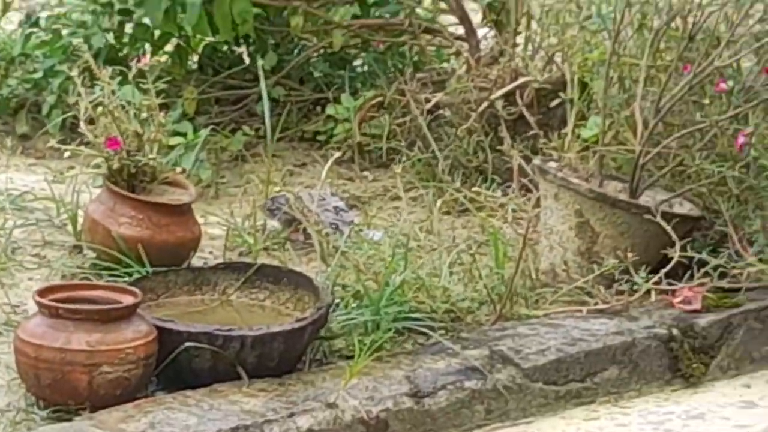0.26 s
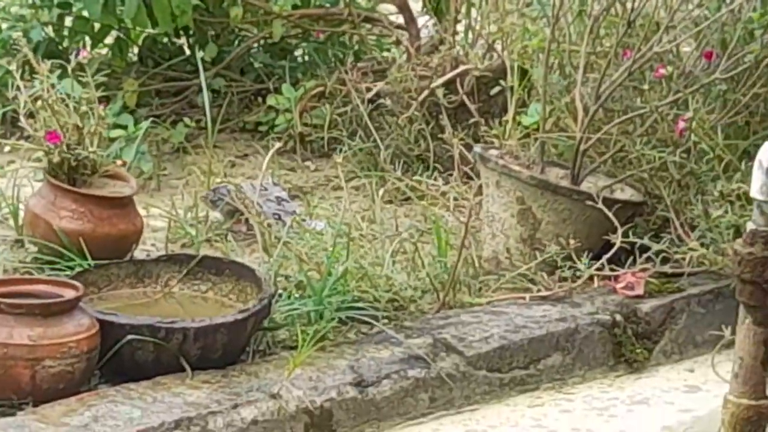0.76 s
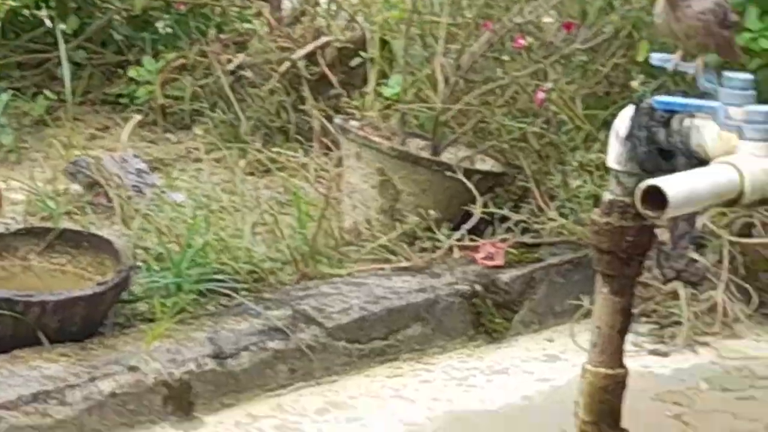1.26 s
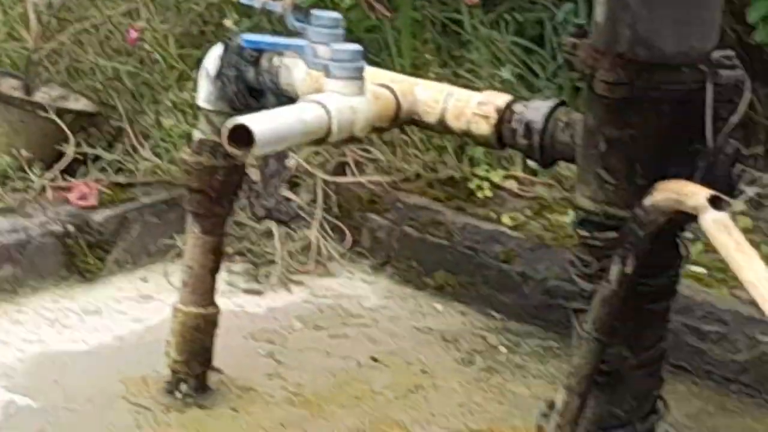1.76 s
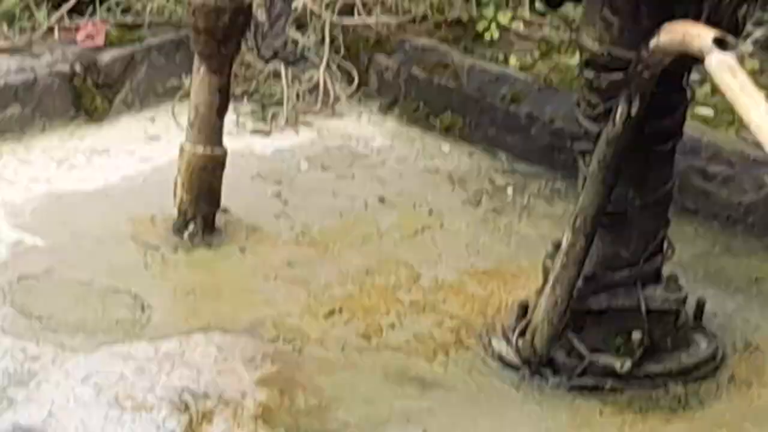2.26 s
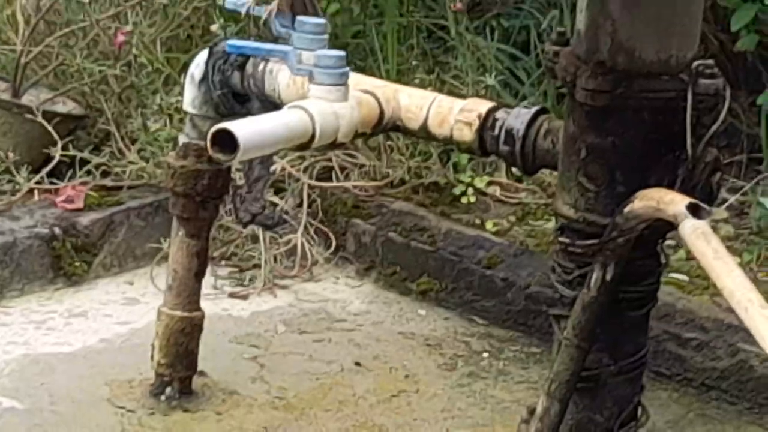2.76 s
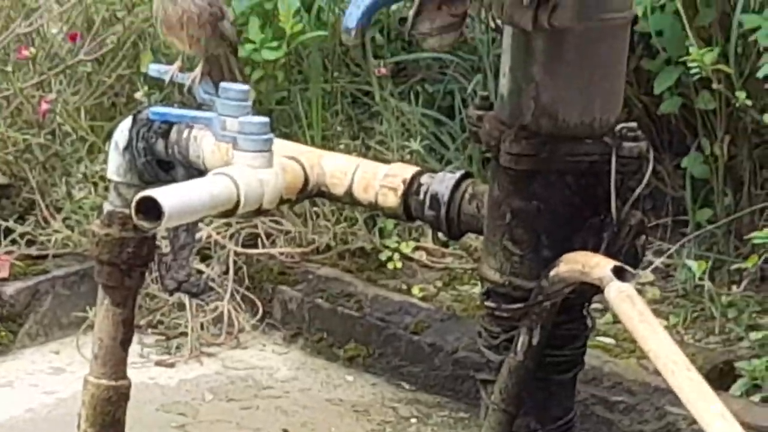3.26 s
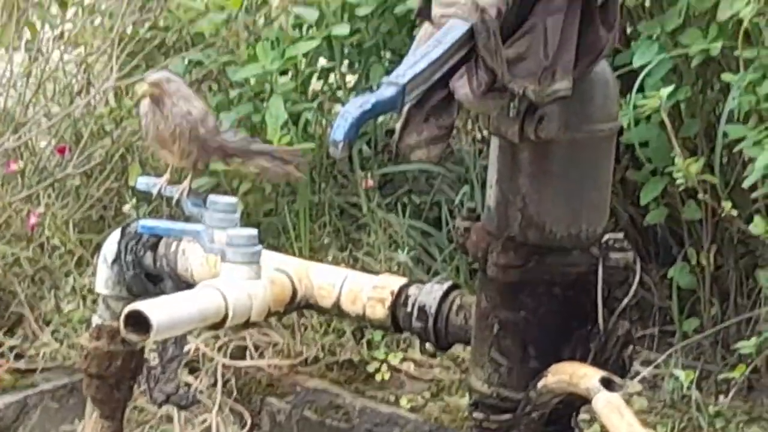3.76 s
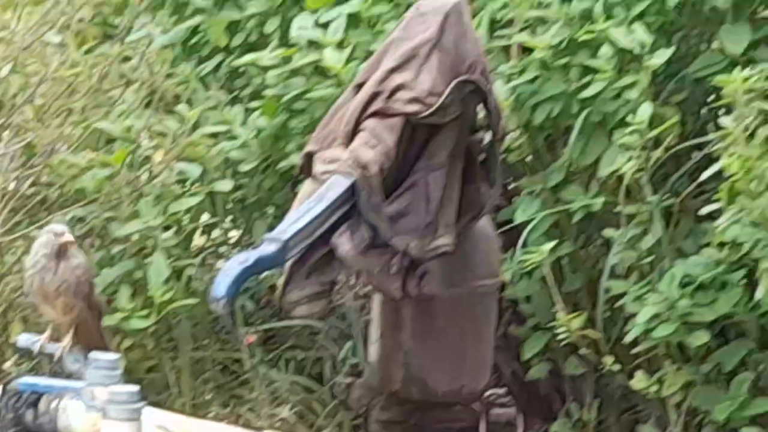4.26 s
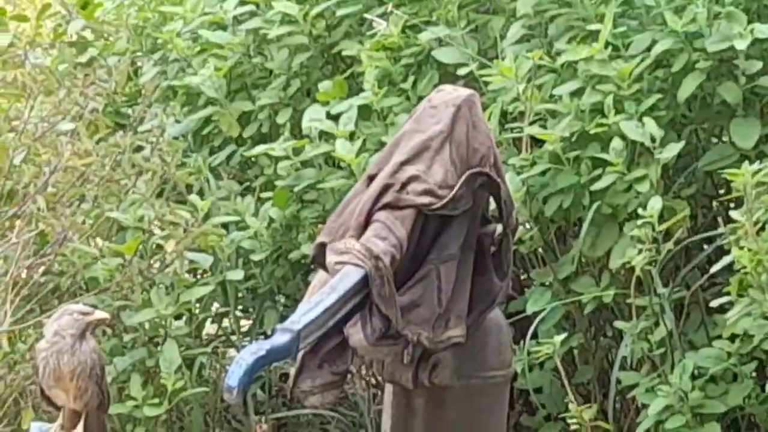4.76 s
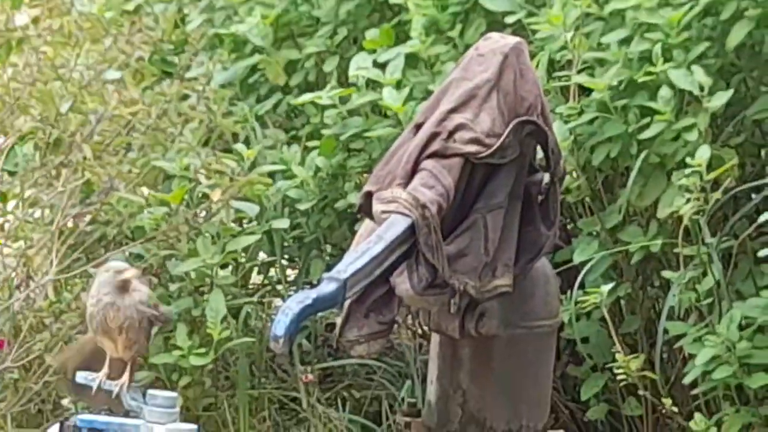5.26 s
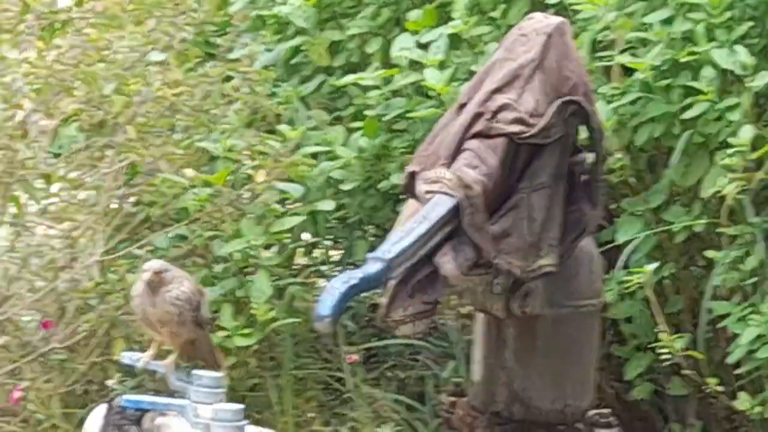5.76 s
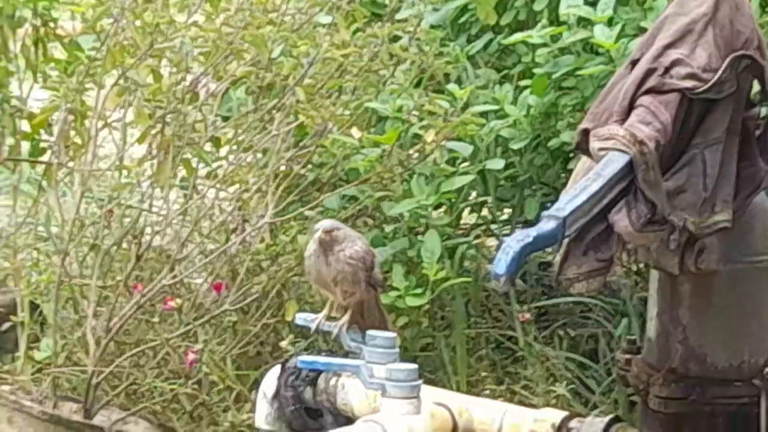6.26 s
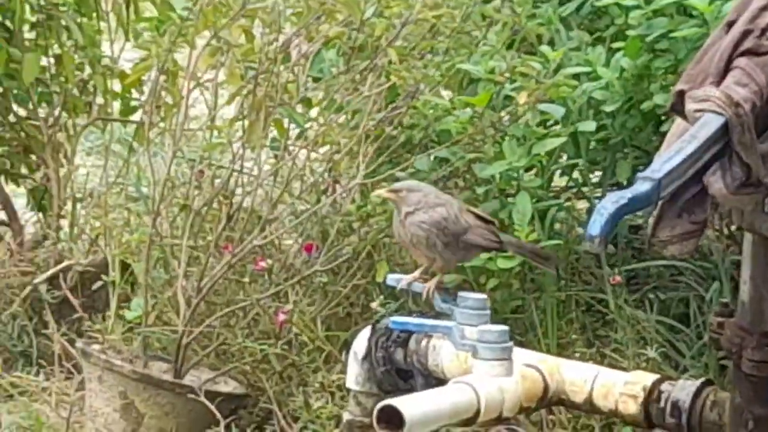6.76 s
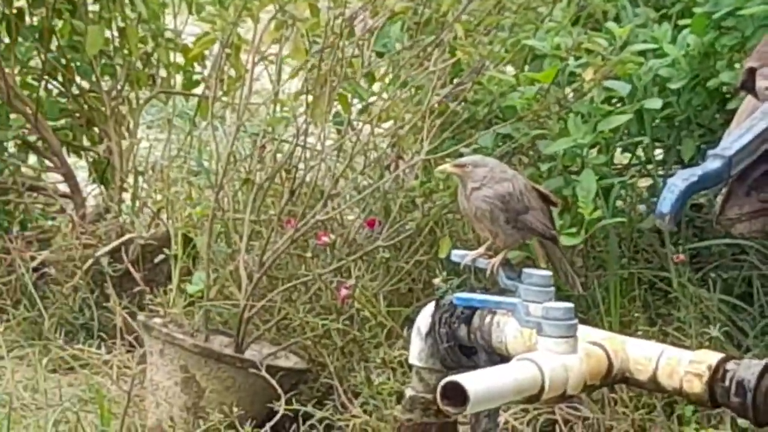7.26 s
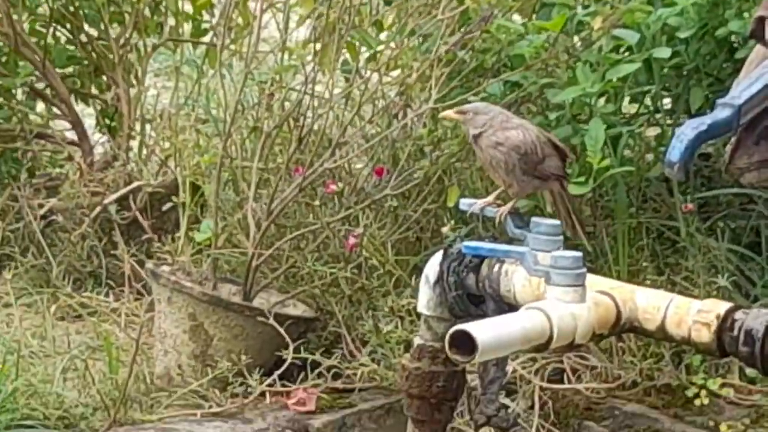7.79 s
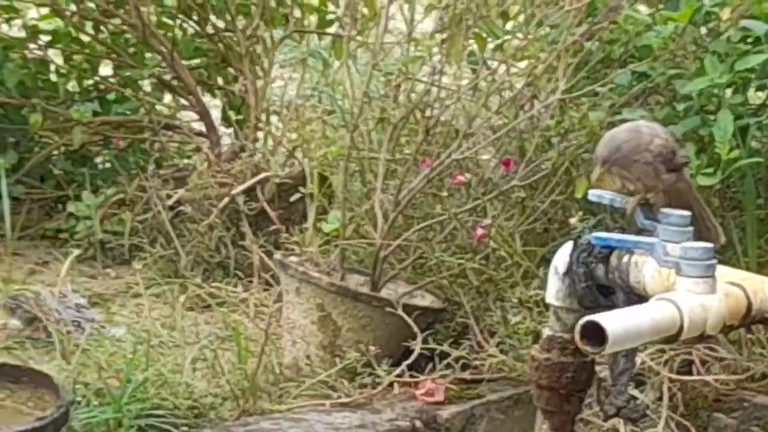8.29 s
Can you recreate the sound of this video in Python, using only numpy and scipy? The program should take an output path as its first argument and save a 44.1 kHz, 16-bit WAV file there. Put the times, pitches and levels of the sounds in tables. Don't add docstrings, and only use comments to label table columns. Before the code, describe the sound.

A garden heard through a hand-held stereo phone. A distant single-cylinder engine throbs as a low, slightly wavering hum throughout, fading a little at the end. From 0 to 0.8 s babblers chatter quickly: short arched whistles around 2 to 3 kHz mixed with dry, harsh chucks. At 1.75 s a nearer bird on the left slides down and breaks hoarse; two quick finger taps crack at 1.9 s, with more chirps around 2 s. A soft ringing tap follows at 2.4 s, then faint pips until 3.1 s. At 3.75 s a longer, louder slide turns into a growl and a hoarse chuck, with a heavy low thump at 3.8 s. Faint peeps follow at 4.1 s. Sparse whistles and chucks return from 5.3 to 8.3 s, with a very faint tap at 7.5 s. Thin cicada buzz swells intermittently, strongest after 5.9 s, as a light breeze rustles leaves.

```python
import sys
import numpy as np
from scipy import signal
from scipy.fft import rfft, irfft
from scipy.io import wavfile
from scipy.ndimage import uniform_filter1d

SR = 44100
rng = np.random.default_rng(int(sys.argv[2]) if len(sys.argv) > 2 else 0)


def transcribe(u):
    v = np.clip(np.atleast_2d(u).T, -1, 1)
    q = np.round(v * 32767).astype(np.int16)
    wavfile.write(sys.argv[1], SR, q)


def level_to_linear(level):
    exponent = np.asarray(level, float) / 20
    return 10 ** exponent


N = 376173
T = np.arange(N) / SR
HZ = np.fft.rfftfreq(N, 1 / SR)
LEFT_LAG_S = .0004

# (frequency [Hz], width [Hz], level [dB])
THROAT = [(870, 300, -3), (2200, 400, 0), (3100, 420, -8), (4250, 440, -2), (5200, 520, -3),
          (6150, 420, -11), (7600, 1600, -23), (12400, 1200, -27), (14600, 1500, -23)]


def at(table, hz):
    f, v = np.transpose(table)
    return np.interp(np.log(np.maximum(hz, 1)), np.log(f), v)


def unit(x):
    return x / np.sqrt(np.mean(x ** 2))


def ramp(t, start_s, length_s):
    return np.clip((t - start_s) / length_s, 0, 1)


def walk(rate, size=N):
    k = max(int(SR / rate), 1)
    steps = np.repeat(rng.standard_normal(size // k + 1), k)
    return 1.63 * uniform_filter1d(uniform_filter1d(steps, k), k)[:size]


def resonances(modes, hz):
    return np.sqrt(sum(level_to_linear(2 * db) / (1 + ((hz - f) / (width / 2)) ** 2) ** 2 for f, width, db in modes))


def wide_noise(gain, alike, pan_db):
    shared, own = rfft(rng.standard_normal((2, N)))
    alike = np.clip(alike, 0, .99)
    late = shared * np.exp(-2j * np.pi * HZ * LEFT_LAG_S)
    left = level_to_linear(pan_db) * (alike * late + np.sqrt(1 - alike ** 2) * own)
    share = 2 / np.sqrt(1 + level_to_linear(pan_db) ** 2 + 2 * alike * level_to_linear(pan_db))
    out = irfft(gain * share * np.array([left, shared]), N)
    return out / np.sqrt(np.mean(out.mean(axis=0) ** 2))


def add(out, start_s, x, pan_db):
    i = int(start_s * SR)
    n = np.arange(len(x))
    fade = np.clip(np.minimum(n, n[::-1]) / (.0025 * SR), 0, 1)
    out[:, i:i + len(x)] += x * fade * 2 / (1 + level_to_linear(np.array([[-pan_db], [pan_db]])))


def pump():
    # (time [s], firing rate [Hz], level [dB])
    run = [
        (0, 11.45, -40),
        (1, 11.7, -41),
        (2.4, 11.2, -39.5),
        (3.5, 12.4, -41),
        (4.598, 11.1, -40.5),
        (5.8, 11.06, -40.5),
        (7, 11.6, -39),
        (7.9, 12.7, -42.5),
        (8.53, 12, -50),
    ]
    # (multiple of firing rate [1], level [dB])
    orders = [(3, -22), (4, -31), (5, -2), (6, -7), (7, -2.5), (8, -2), (9, 0), (10, -5), (11, 2.5),
              (12, -5), (13, -14), (14, -6.5), (16, -10), (18, -13)]
    s, hz, db = np.transpose(run)
    turn = 2 * np.pi * np.cumsum(np.interp(T, s, hz)) / SR
    hum = np.zeros(N)
    for k, level_db in orders:
        sway = level_to_linear(level_db + 1.9 * walk(2.5))
        hum += sway * np.sin(np.round(k) * turn + 7 * rng.random() + .5 * walk(3))
    hum = unit(hum) * level_to_linear(np.interp(T, s, db))
    return np.array([level_to_linear(-1.5) * np.roll(hum, int(LEFT_LAG_S * SR)), hum])


def garden():
    # (frequency [Hz], level [dB per Hz])
    air_colour = [(15, -57), (25, -39), (43, -6.5), (119, 0.5), (156, -15.5), (342, -12), (424, -17.5),
                  (1120, -29), (1280, -31), (2880, -35.5), (6120, -47), (7800, -47.5), (8690, -70),
                  (10500, -61.5), (15700, -69)]
    # (frequency [Hz], likeness [0-1])
    air_alike = [(60, 1), (250, 0.92), (500, 1), (1000, 0.15), (2000, 0.04), (5000, 0.011)]
    # (frequency [Hz], left minus right [dB])
    air_pan = [(60, 1.5), (110, -2.5), (200, -0.5), (380, -3.5), (700, -1.5), (1290, -5.5), (2380, -4.5),
               (4400, 1), (8120, -10.5), (15000, -1)]
    # (frequency [Hz], level [dB per Hz])
    leaf_colour = [(300, 1), (700, -4), (1500, -0.5), (3000, 1), (5000, -2), (7500, -11), (9000, -13),
                   (10500, -7), (12000, -5.5), (14500, -7), (15800, -15)]
    # (frequency [Hz], left minus right [dB])
    leaf_pan = [(60, 18), (110, 19), (200, 4), (380, -2), (700, 10), (1290, -7), (2380, -8.5), (4400, -3.5),
                (8120, -12.5), (15000, -72)]
    # (time [s], level [dB])
    breeze = [
        (0, -68),
        (1.2, -72),
        (5.0, -70),
        (5.7, -64),
        (6.9, -60.5),
        (7.7, -60.5),
        (8.53, -65),
    ]
    # (start [s], end [s], level
    # [dB])
    choruses = [
        (-.5, 1.71, -73.5),
        (2.65, 4.94, -72.5),
        (5.9, 8.3, -68.5),
    ]
    # (frequency [Hz], width [Hz], level [dB])
    shells = [(7870, 340, 7.5), (7340, 650, -0.5), (10280, 430, -2)]
    fade_db_per_s, rest_db = 28, -88

    alike = at(air_alike, HZ)
    air = wide_noise(level_to_linear(at(air_colour, HZ)), alike, at(air_pan, HZ)) * level_to_linear(-43 + 0.18 * walk(6))
    gust_db = np.interp(T, *np.transpose(breeze)) + 6.15 + .5 * walk(14)
    leaves = wide_noise(level_to_linear(at(leaf_colour, HZ)), 0.85 * alike, at(leaf_pan, HZ)) * level_to_linear(gust_db)
    chorus_db = np.full(N, float(rest_db))
    for start, end, db in choruses:
        outside_s = np.maximum(np.maximum(start - T, T - end), 0)
        chorus_db = np.maximum(chorus_db, db - fade_db_per_s * outside_s)
    cicadas = wide_noise(resonances(shells, HZ), .3, -41.0) * level_to_linear(chorus_db + 1.0 * walk(50))
    return air + leaves + cicadas


def note(shape, length, top_hz, db, octave_db):
    scoop, rise_s, sag, plunge, fall_s, fade_db = shape
    t = T[:int(length * SR)]
    early, late = 1 - ramp(t, 0, rise_s), ramp(t, length - fall_s, fall_s)
    hz = top_hz * (1 - scoop * early ** 2 - sag * np.maximum(t - rise_s, 0) - plunge * late ** 2)
    db = db - 8 * early ** 2 - fade_db * t - 7 * late ** 2
    return hz, db, db + octave_db - 12 * (1 - ramp(t, 0, .022))


def whistles(out):
    # (time [s], length [s], top [Hz], level [dB], octave against the note [dB])
    peeps = [
        (.006, 0.03, 2385, -44, -8),
        (.058, 0.08, 2370, -47, -1),
        (.135, 0.071, 2990, -54.5, 2),
        (.506, 0.051, 2514, -50.5, -0.5),
        (.58, .016, 2330, -55, -20),
        (1.946, 0.04, 2380, -48, -2),
        (4.082, 0.048, 2465, -52.5, -0.5),
        (4.178, .052, 2460, -50, -13),
        (5.49, .04, 2880, -61, -30),
    ]
    high_peeps = [
        (.003, 0.023, 3260, -56, -7),
        (.052, 0.051, 3240, -49.5, -4.5),
        (8.153, 0.037, 3140, -53.5, -32),
        (8.262, .042, 2022, -55.5, -7),
    ]
    falls = [
        (.028, 0.042, 2186, -43, -20),
        (.335, 0.049, 2200, -50, -7),
        (6.12, 0.073, 2335, -55.5, -25),
    ]
    arches = [
        (.23, .048, 2550, -44.5, -11),
        (.688, .075, 2670, -45, -8),
    ]
    hooks = [
        (.588, .046, 3030, -49.5, -12),
        (1.996, .042, 3000, -48, -30),
        (6.172, .048, 3160, -50, -6),
    ]
    drones = [(1.61, .022, 2070, -60, -20), (1.65, .105, 3600, -64, -25), (1.842, .05, 2700, -59.5, -22),
              (2.8, .14, 3610, -64, -25), (5.33, .03, 2120, -62, -25), (5.6, .08, 540, -56, -9),
              (5.675, .065, 2750, -56, -28), (5.72, .08, 3320, -69, -20), (6.222, .045, 3130, -60, -5),
              (6.63, .035, 2070, -56, -26), (8.05, .15, 4340, -65.5, -25)]
    # (time [s], pitch [Hz], level [dB])
    pip_calls = [
        (2.5, 2980, -66),
        (2.565, 2960, -59.5),
        (2.63, 2960, -62),
        (2.69, 2940, -59.5),
        (2.76, 2892, -62),
        (2.95, 2880, -63),
        (3.07, 2880, -67),
    ]
    # (scoop up [share], rise [s], sag [share per s], plunge [share], fall [s], fade [dB per s])
    peep_shape = (.1, .019, .75, .035, .014, 50)
    fall_shape = (.04, .008, 1.7, .06, .016, 40)
    arch_shape = (.2, .021, 1.1, .27, .018, 20)
    hook_shape = (.07, .024, .1, .5, .018, 1)
    drone_shape = (.012, .012, .15, .01, .02, 15)
    pip_shape = (.005, .012, .3, .02, .014, 1)
    far_pan_db, high_pan_db, breath_db = -7, -2, -11.5

    pips = [(s, .026, hz, db, -np.inf) for s, hz, db in pip_calls]
    groups = ((peeps, peep_shape, far_pan_db), (high_peeps, peep_shape, high_pan_db),
              (falls, fall_shape, far_pan_db), (arches, arch_shape, far_pan_db),
              (hooks, hook_shape, far_pan_db), (drones, drone_shape, far_pan_db), (pips, pip_shape, far_pan_db))
    for notes, shape, pan_db in groups:
        for s, *call in notes:
            hz, db, octave_db = note(shape, *call)
            size = len(hz)
            turn = 2 * np.pi * np.cumsum(hz * (1 + .007 * walk(250, size=size))) / SR
            tone = level_to_linear(db + 1.8 * walk(150, size=size)) * np.sin(turn)
            octave_db = octave_db + 3 * walk(150, size=size) - 80 * (1 - hz / hz.max())
            octave = level_to_linear(octave_db) * np.sin(2 * turn + 1)
            husk = 1 + level_to_linear(breath_db) * walk(1500, size=size)
            add(out, s, np.sqrt(2) * husk * (tone + octave), pan_db)


def rasp(size, weight):
    hz = np.fft.rfftfreq(size, 1 / SR)
    flaps = rng.standard_normal(size) * level_to_linear(2.4 * walk(300, size=size))
    return unit(irfft(rfft(flaps) * resonances(THROAT, hz) * weight(np.maximum(hz, 1)), size))


def chucks(out):
    # (time [s], length [s], loudest [Hz], level [dB], spread [octaves])
    ahead = [(.005, 0.076, 3600, -51, 1.1), (0.088, 0.04, 3440, -49, 0.6), (0.124, 0.097, 3300, -54.5, 1.2),
             (0.609, 0.041, 2700, -50, 0.87), (1.978, 0.017, 2200, -58, 0.45),
             (2.024, 0.023, 2780, -47, 0.89), (5.538, 0.085, 2500, -56, .6),
             (6.202, 0.039, 2400, -50, 1.25), (6.701, 0.043, 3500, -56, 0.38),
             (7.146, 0.017, 2980, -54.5, .4), (7.23, 0.036, 3400, -55, 0.24),
             (7.581, 0.042, 2300, -49.5, 1.9), (8.039, .03, 2000, -58, .4)]
    right = [
        (.355, 0.038, 3000, -54, 1.9),
        (.752, 0.035, 2600, -50, 1.4),
        (3.455, 0.036, 2000, -54.5, 1.5),
        (4.085, .17, 3400, -60, 0.73),
        (4.23, 0.035, 2320, -56, 0.99),
        (5.6, 0.09, 2285, -51, 0.76),
        (5.68, 0.09, 2600, -59, 0.6),
        (6.66, 0.041, 2580, -51, 0.77),
        (7.21, 0.023, 1300, -54, .9),
    ]
    for calls, pan_db in ((ahead, -1.2), (right, -8)):
        for s, length, top_hz, db, spread in calls:
            def colour(hz):
                bump = np.exp(-(np.log2(hz / top_hz) / spread) ** 2)
                return bump / resonances(THROAT, hz) ** .7
            swell = np.hanning(int(length * SR)) ** .55
            add(out, s, level_to_linear(db) * swell * rasp(len(swell), colour), pan_db)


def voice(hz, db, rough, fall_db):
    rough, size = np.clip(rough, 0, .97), len(hz)
    turn = 2 * np.pi * np.cumsum(hz * (1 + 0.058 * rough * walk(600, size=size))) / SR
    gains = []
    for k in range(1, 9):
        chest = .25 * (k == 1) * (1 - rough) ** 3
        throat = resonances(THROAT, k * hz) ** 1.2 + .02 + chest
        gains.append(throat * level_to_linear(-fall_db * np.log2(k)) * (k * hz < 7000))
    gains = np.array(gains)
    gains /= np.sqrt(np.sum(gains ** 2, axis=0) / 2)
    clear = sum(g * np.sin((k + 1) * turn + k * k) for k, g in enumerate(gains))
    return level_to_linear(db) * (np.sqrt(1 - rough) * clear + np.sqrt(rough) * rasp(size, np.ones_like))


def slide(s, knee_s, knee_db, rasp_db, speed):
    # (time after the knee [s], pitch [Hz], level against the rasp [dB])
    voice_break = [
        (.008, 1826, -4),
        (.018, 1680, -0.5),
        (.028, 1130, 2.5),
        (.037, 930, -4.5),
        (0.049, 820, 0),
    ]
    onset_hz, whistle_hz, knee_hz, bow_hz = 2340, 2260, 2050, 43.8
    onset_s, onset_db, whistle_db = .006, -14, -38
    clear_hz, hoarse_hz = 1810, 910
    whistle_fall_db, rasp_fall_db = 3.5, -1.5

    after, low_hz, low_db = np.transpose(voice_break)
    times = np.r_[s, s + onset_s, knee_s, knee_s + after / speed]
    t = np.arange(s, times[-1], 1 / SR)
    smooth = lambda v: uniform_filter1d(np.interp(t, times, v), size=90, mode="nearest")
    held = ramp(t, s + onset_s, knee_s - s - onset_s)
    hz = smooth(np.r_[onset_hz, whistle_hz, knee_hz, low_hz]) + bow_hz * np.sin(np.pi * held)
    level_db = smooth(np.r_[whistle_db + onset_db, whistle_db, knee_db, rasp_db + low_db])
    level_db += (whistle_db - knee_db) * (held - held ** 2.8) + 0.5 * walk(155, size=len(t))
    rough = ramp(-hz, -clear_hz, clear_hz - hoarse_hz) ** 1.9
    fall_db = whistle_fall_db + (rasp_fall_db - whistle_fall_db) * ramp(t, knee_s, .018)
    return voice(hz, level_db, rough, fall_db)


def scold(length, first_hz, last_hz, db, fall_db):
    size = int(length * SR)
    return np.hanning(size) ** .28 * voice(np.linspace(first_hz, last_hz, size), db, .62, fall_db)


def babblers():
    # (time [s], break [s], level at the break [dB], rasp [dB], speed of the break [ratio])
    slides = [
        (1.757, 1.807, -52, -44, 1.15),
        (3.751, 3.833, -45.5, -38, 1.01),
    ]
    # (time [s], length [s], first [Hz], last [Hz], level [dB])
    near_scolds = [
        (3.925, 0.055, 1072, 1035, -40),
    ]
    far_scolds = [
        (7.205, .03, 1370, 1050, -50),
        (7.575, .047, 1120, 1000, -49),
    ]
    near_pan_db, scold_pan_db = 10, -2
    echo_db, near_echo_db, echo_t60_s = -5, -14, .36

    far, near = np.zeros((2, 2, N))
    whistles(far)
    chucks(far)
    for call in slides:
        add(near, call[0], slide(*call), near_pan_db)
    for s, *call in near_scolds:
        add(near, s, scold(*call, fall_db=2.5), near_pan_db)
    for s, *call in far_scolds:
        add(far, s, scold(*call, fall_db=17), scold_pan_db)

    t = T[:SR // 3]
    tail = rng.standard_normal((2, len(t))) * level_to_linear(-60 * t / echo_t60_s) * np.clip(t / 0.0079, 0, 1)
    tail /= np.sqrt(np.sum(tail ** 2, axis=1, keepdims=True))
    sent = level_to_linear(echo_db) * far.mean(axis=0) + level_to_linear(near_echo_db) * near.mean(axis=0)
    out = far + near + signal.fftconvolve(sent[None], tail, axes=1)[:, :N]
    left = signal.sosfilt(signal.butter(4, 8000, fs=SR, output="sos"), out[0])
    treble = signal.sosfilt(signal.butter(6, 11000, "high", fs=SR, output="sos"), near[1])
    return np.array([left, out[1] + level_to_linear(13) * treble])


def taps():
    # (time [s], ring level [dB], ring [Hz], dip level [dB], crack level [dB])
    touches = [
        (1.9227, -24, 270, -35, -30.5),
        (1.9321, -16, 244, -18.5, -23),
        (2.3654, -19.5, 248, -50, -48),
        (3.8161, -9, 101, -14, -62),
        (7.52, -31, 262.8, -36, -48),
    ]
    ring_cycles, leak_db = 9, -29
    x, t = np.zeros(N), T[:SR // 8]
    for s, ring_db, ring_hz, dip_db, crack_db in touches:
        i, lead = int(s * SR), int(0.00134 * SR)
        x[i:i + len(t)] += level_to_linear(ring_db - 60 * t * ring_hz / ring_cycles) * np.sin(2 * np.pi * ring_hz * t)
        x[i - lead:i] -= level_to_linear(dip_db) * np.sin(np.pi * np.arange(lead) / lead)
        crack = np.sin(2 * np.pi * 1500 * t + 1.5 * walk(3000, size=len(t)))
        crack += level_to_linear(-22) * rng.standard_normal(len(t))
        strike = level_to_linear(crack_db - 60 * t / 0.012) * np.clip(t / 0.00012, 0, 1)
        x[i - 2 * lead:i - 2 * lead + len(t)] += strike * crack
    return x * level_to_linear(np.array([[0], [leak_db]]))


def scene():
    return pump() + garden() + babblers() + taps()


def top_cut(x):
    return signal.sosfilt(signal.butter(12, 15870, fs=SR, output="sos"), x)


def record(dry):
    top = signal.ellip(10, .2, 70, 15750, fs=SR, output="sos")
    return top_cut(signal.sosfilt(top, dry))


dry = scene()
out = record(dry)
transcribe(out)
```